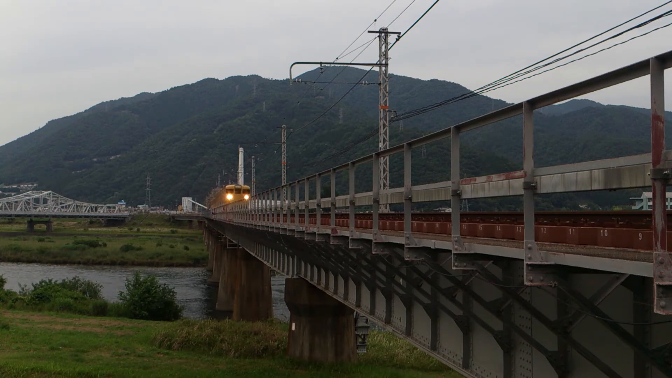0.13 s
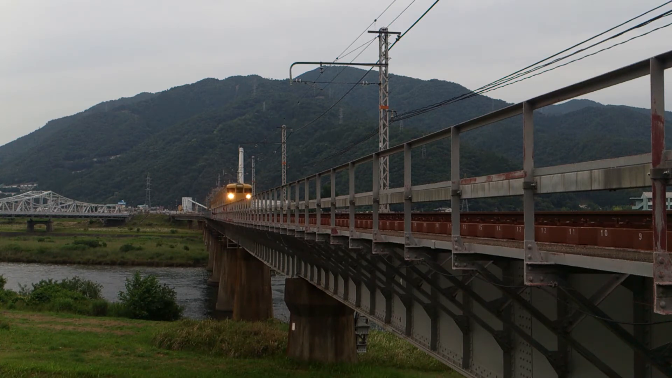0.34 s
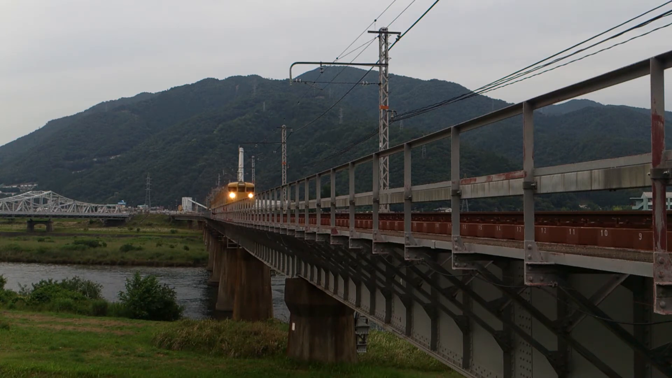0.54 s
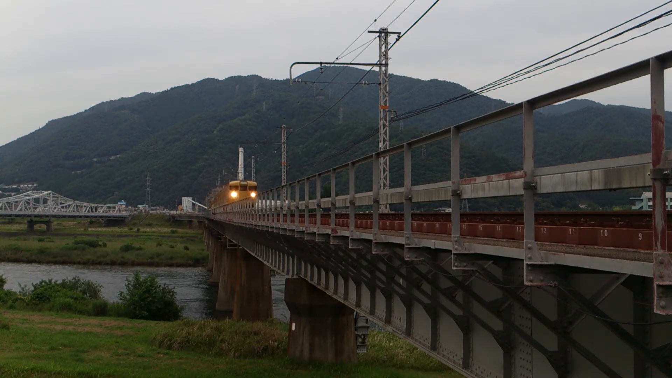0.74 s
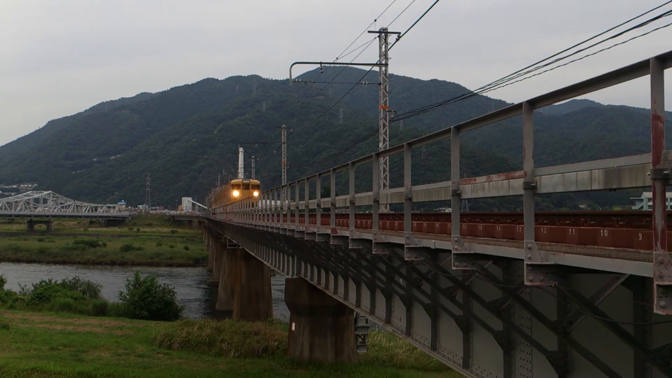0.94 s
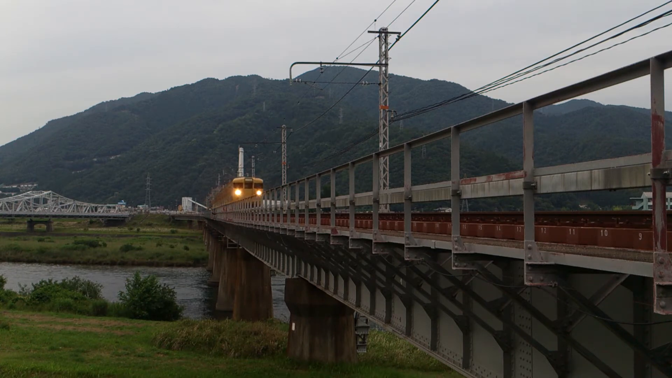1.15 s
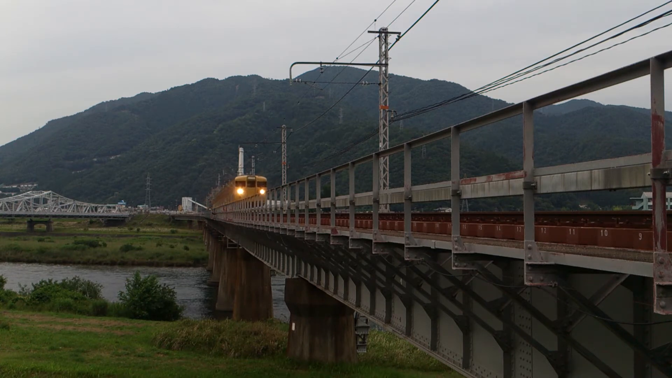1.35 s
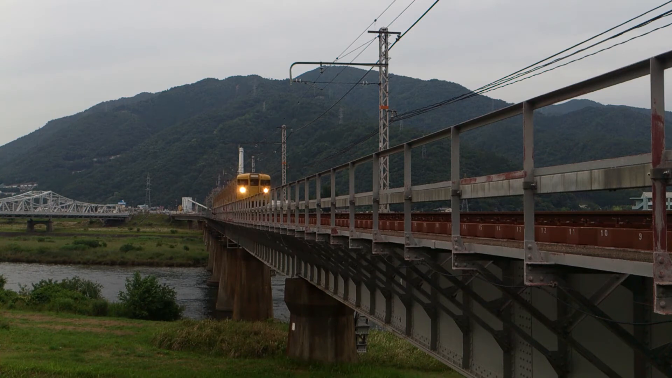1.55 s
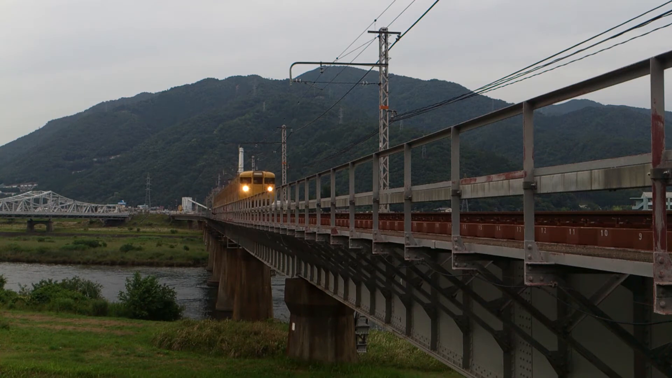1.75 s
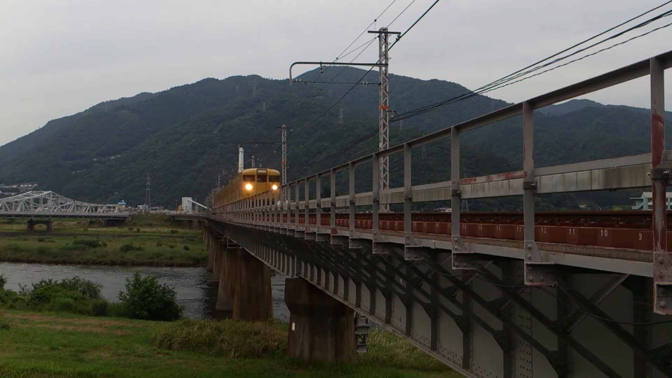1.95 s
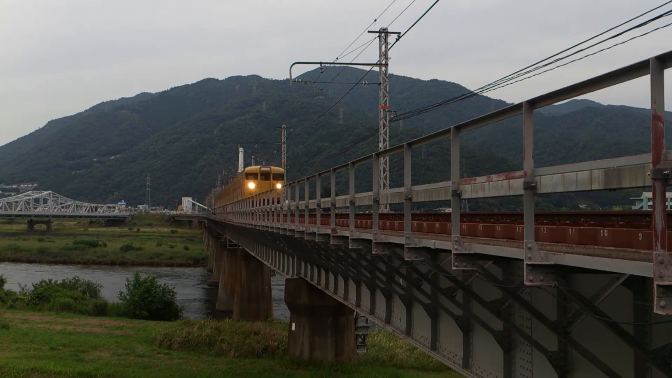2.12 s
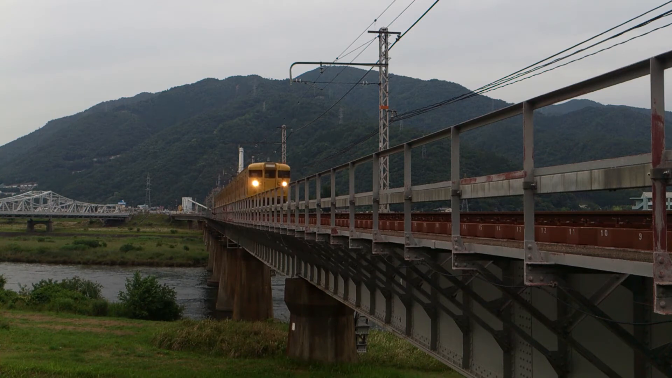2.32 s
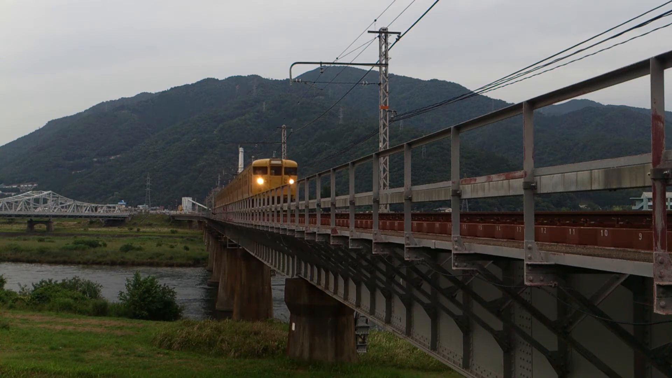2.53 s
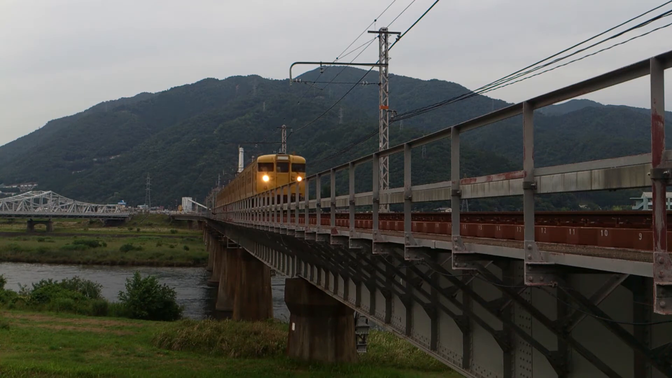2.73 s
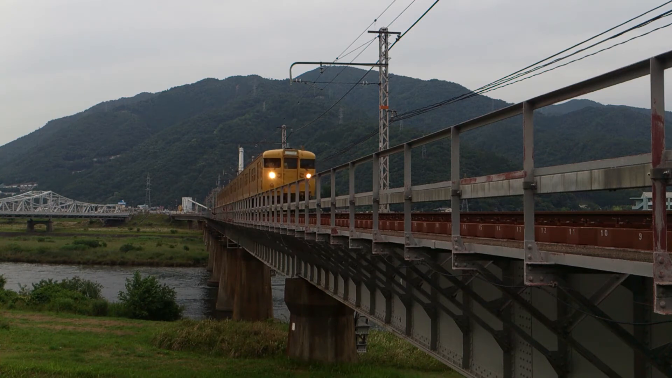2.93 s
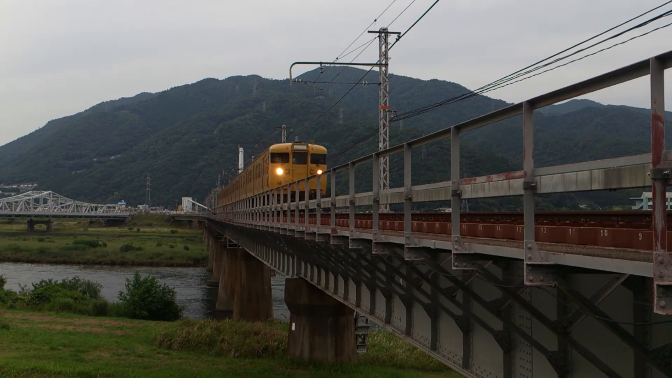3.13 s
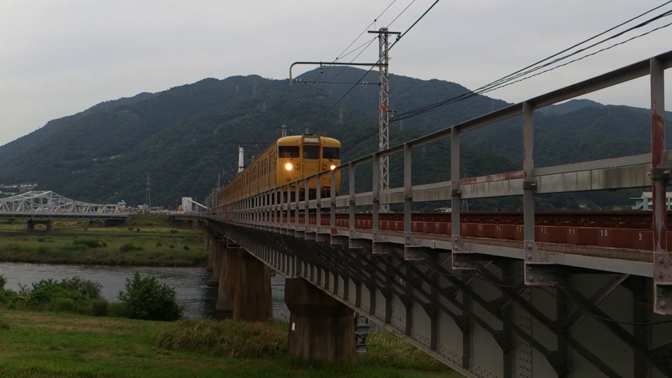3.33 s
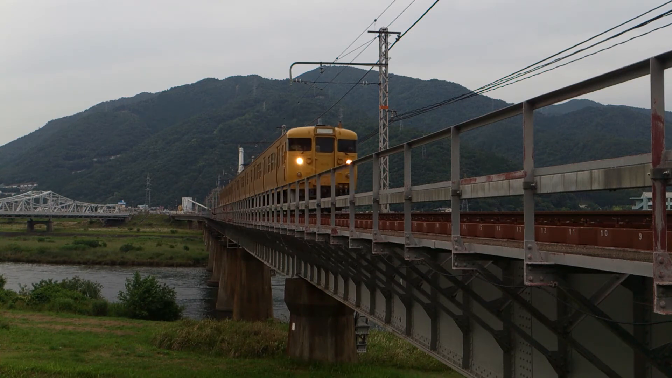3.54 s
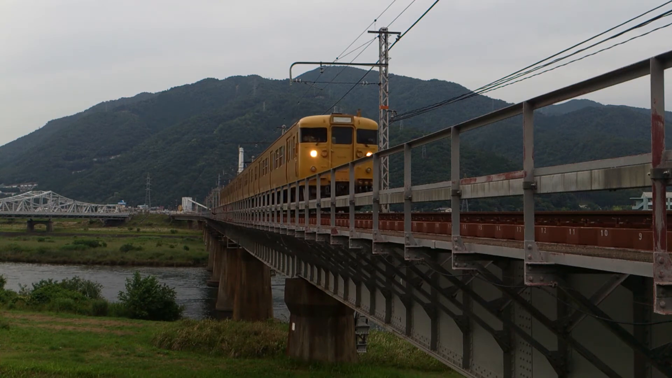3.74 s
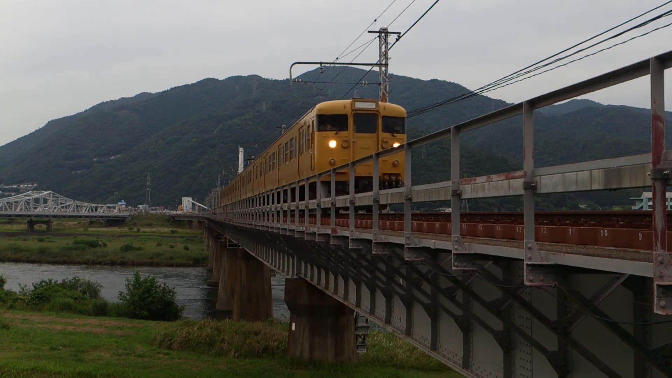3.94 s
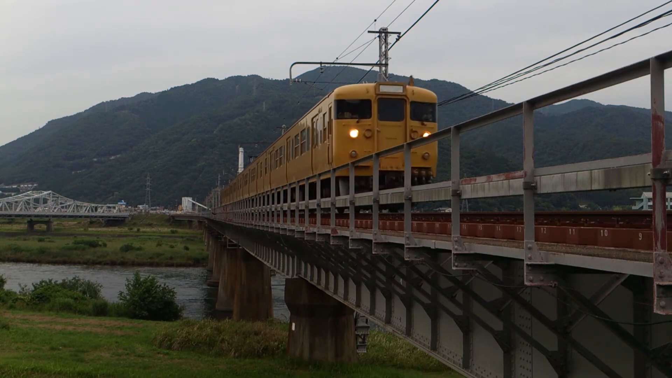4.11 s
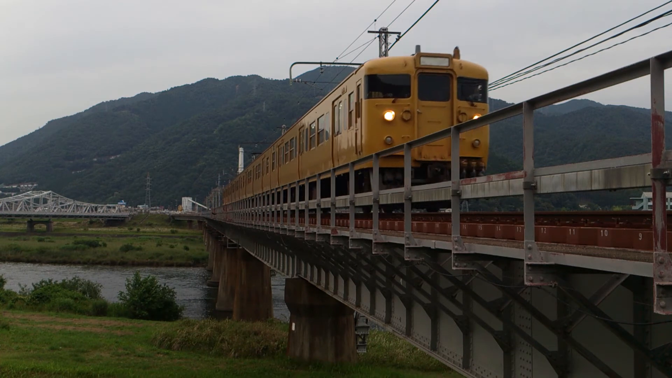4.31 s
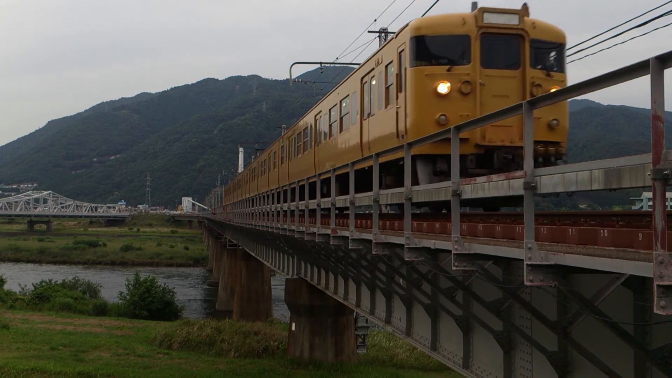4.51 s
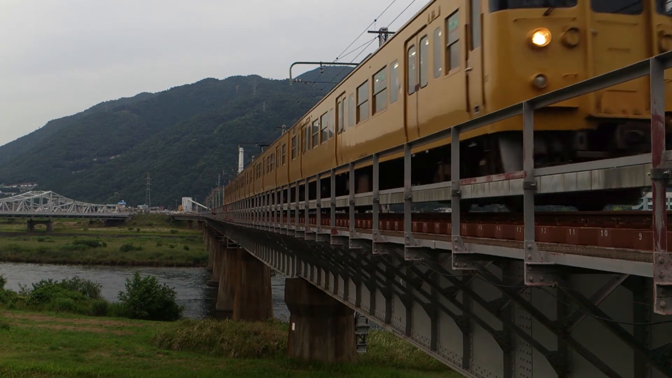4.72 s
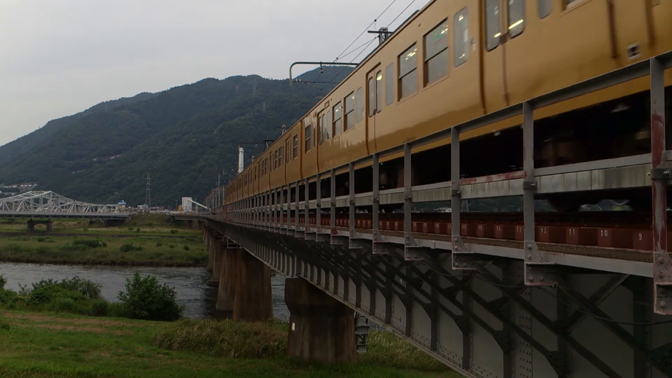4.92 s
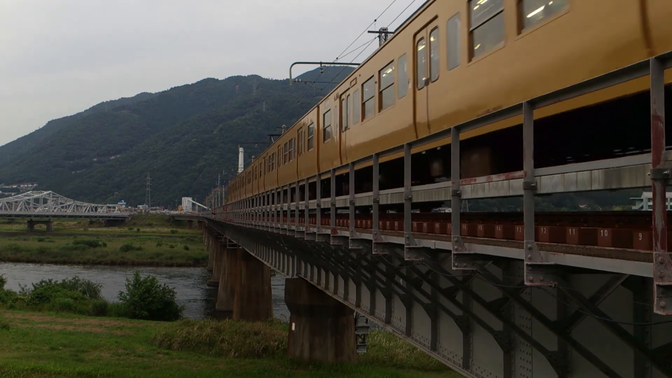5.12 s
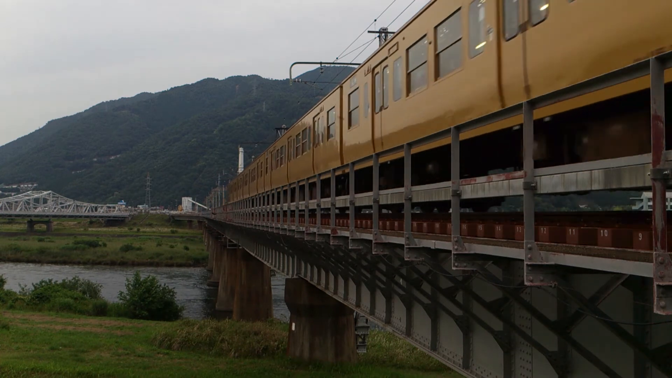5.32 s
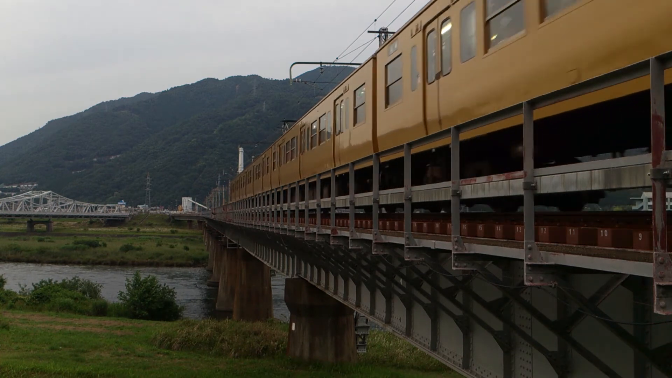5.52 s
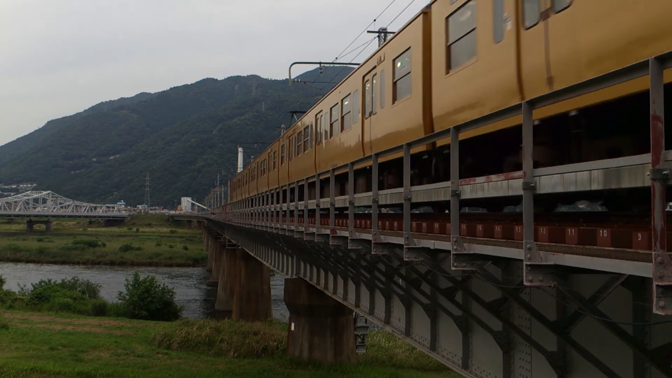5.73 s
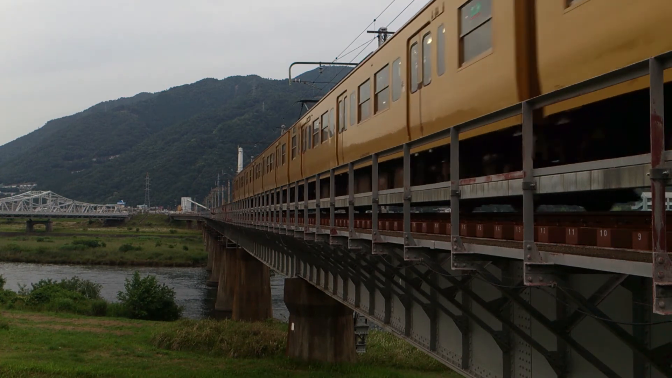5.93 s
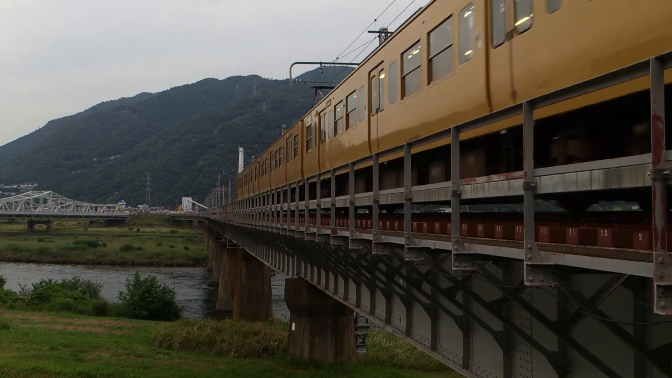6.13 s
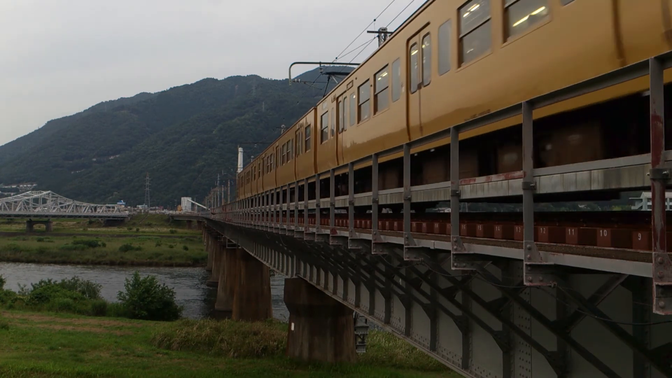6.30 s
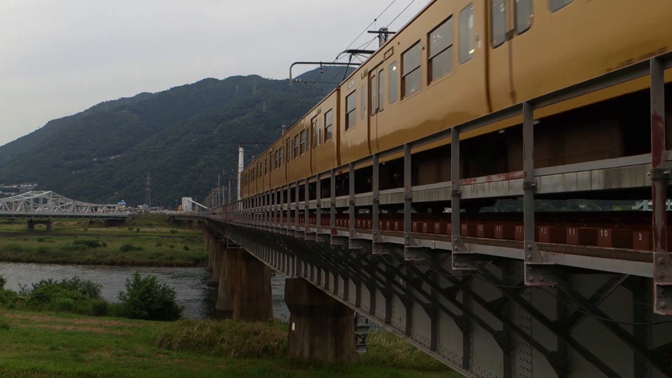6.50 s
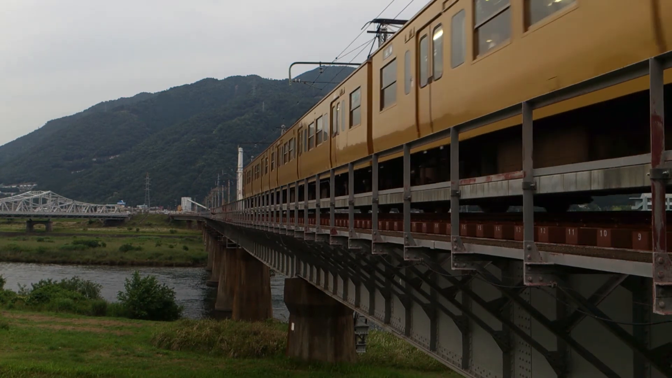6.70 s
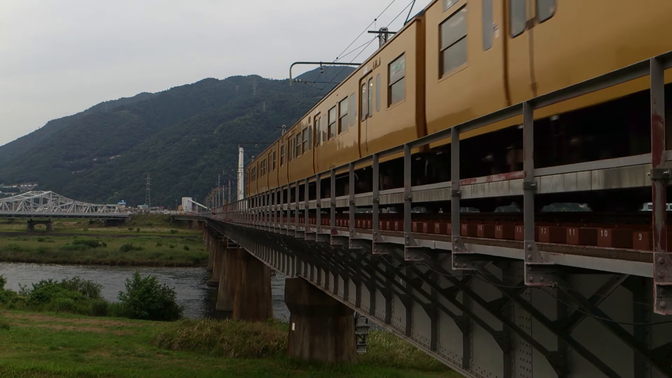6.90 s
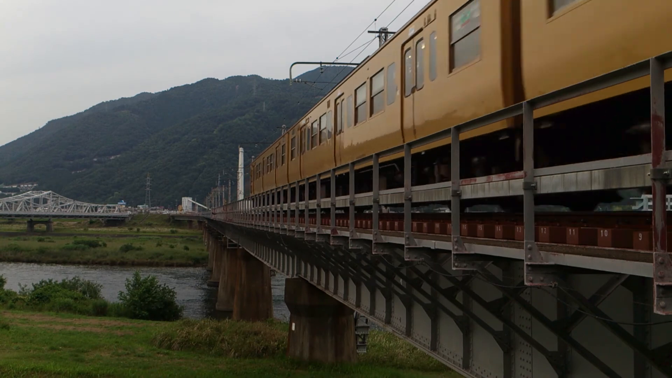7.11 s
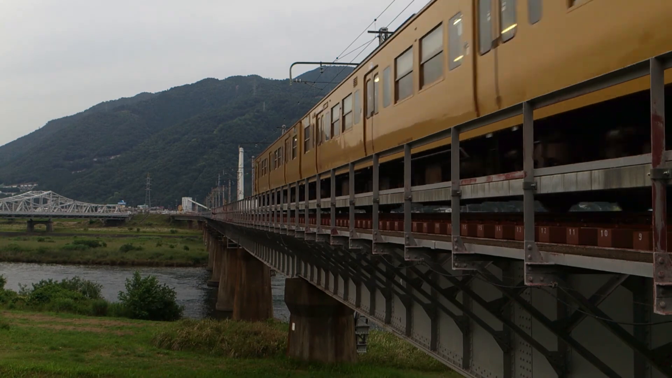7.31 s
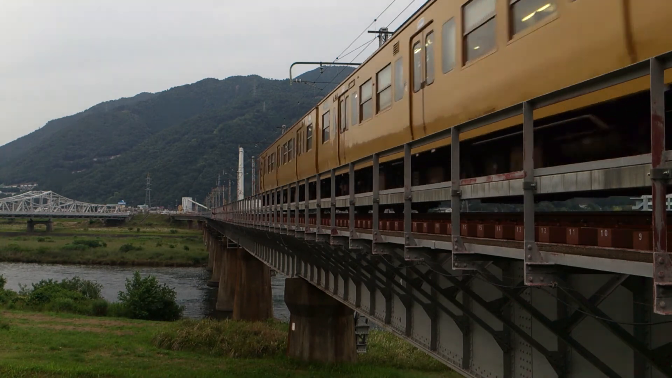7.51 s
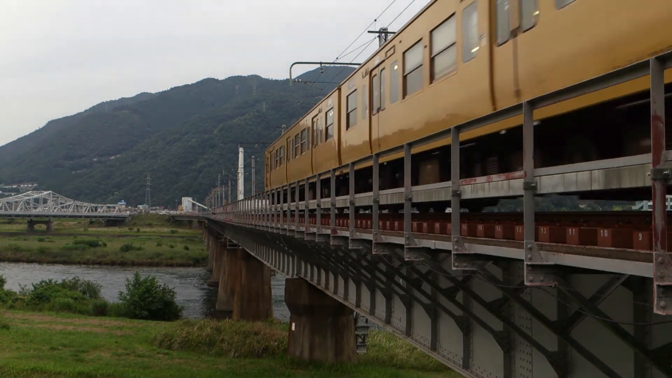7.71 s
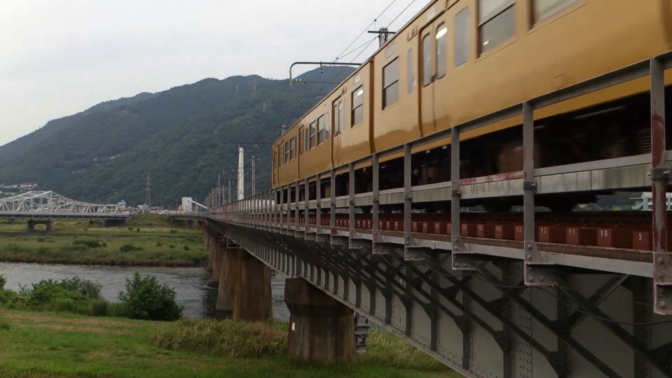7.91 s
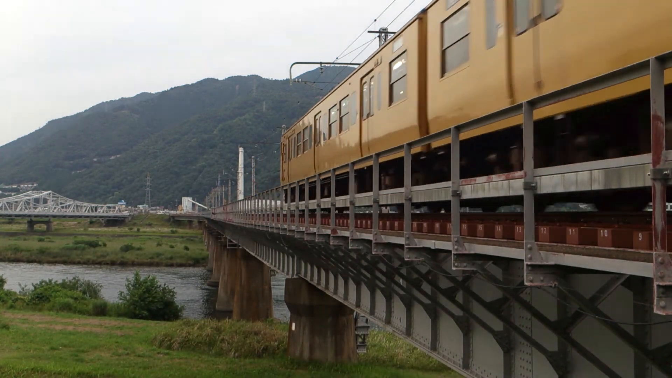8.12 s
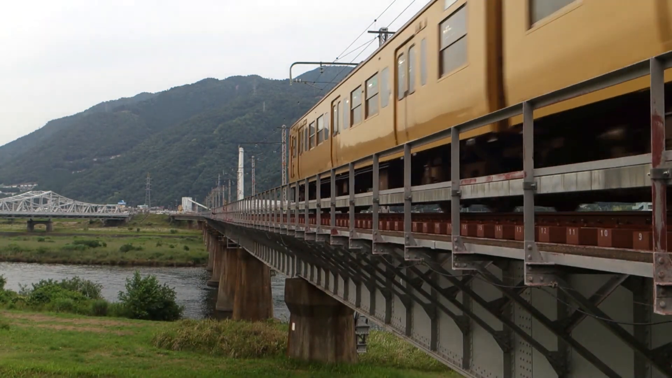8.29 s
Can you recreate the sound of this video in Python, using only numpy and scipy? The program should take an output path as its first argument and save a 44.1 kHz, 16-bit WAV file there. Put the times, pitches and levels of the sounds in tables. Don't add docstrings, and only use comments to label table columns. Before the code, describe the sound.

On an open riverbank beside a steel girder bridge, smooth water hiss lies under a faint, wavering low rumble in the metal. Very close to the microphone, a reflex camera fires at about 0.1, 0.35, 0.6 and 1.0 seconds, each a crisp cluster of mirror and shutter clicks. From 1.8 to 2.7 seconds a small bird gives thin, high ticks. Meanwhile the bridge drone deepens, and from 2.7 seconds faint distant axle knocks come through. A fifth, slightly louder shutter burst lands at 4.0, just as the electric train arrives. From 4.1 the girders boom and hum, with rolling roar and bright steel hiss. Paired clanks and thuds strike the rail joints in recurring groups around 4.2, 5.0-5.7, 6.1-6.9 and 7.3-8.1 seconds, with plates ringing and loose metal tinkling. The strongest bangs come late, and the train is still passing loudly at about 8.3 seconds.

```python
import sys
import numpy as np
from scipy import signal
from scipy.fft import rfft, irfft
from scipy.io import wavfile
from scipy.ndimage import uniform_filter1d

SR = 44100
rng = np.random.default_rng(int(sys.argv[2]) if len(sys.argv) > 2 else 0)


def file_out(sig):
    cols = np.atleast_2d(sig).T
    lim = np.clip(cols, -1, 1)
    pcm = np.round(lim * 32767).astype(np.int16)
    wavfile.write(sys.argv[1], SR, pcm)


def rack_gain(trim_db):
    fader = np.asarray(trim_db, float)
    return 10 ** (fader / 20)


N = 368235

# frequency in Hz, width in Hz, lift in dB.
PLATE_MODES = [(72, 8, 4), (123, 8, 4), (160, 10, 6), (203, 10, 5), (290, 14, 0), (335, 10, 1),
               (368, 10, 4), (435, 12, 2), (560, 12, 2), (635, 10, 3), (665, 14, 5)]
# frequency in Hz, width in Hz, level in dB above the wheel ring.
WHEEL_MODES = [(3500, 490, -10), (4200, 280, -30), (5000, 200, -27), (5960, 270, -14.5), (7170, 200, -19),
               (8050, 120, -13.5)]
# frequency in Hz, density in dB per Hz.
BODY_SPECTRUM = [(12, -53), (20, 9), (87, -1), (211, -4), (240, -5), (273, -3.5), (357, -6), (499, -12),
                 (654, -12.5), (732, -15.5), (900, -16.5), (1170, -54), (1980, -120)]
# frequency in Hz, density in dB per Hz.
CONTACT_SPECTRUM = [(350, -30), (600, -5), (929, -7.5), (1290, -9), (2200, -14.5), (3050, -22.5),
                    (4170, -15), (5190, -21), (5950, -19), (6640, -17), (7610, -9), (9220, -22),
                    (11900, -33), (15100, -34.5), (15700, -40)]
# frequency in Hz, density in dB per Hz.
RIVER_SPECTRUM = [(350, -29), (600, 10), (660, -33), (717, -15), (1310, -15.5), (1790, -18.5),
                  (3650, -25.5), (4360, -25), (5570, -33.5), (7840, -23), (9760, -39), (15800, -44)]
# time in seconds, clank in dB, rail thud in dB, sizzle in dB above clank.
FAR_JOINT = [(2.7094, -35.5, -25.5, -26), (2.8394, -42, -29, -25), (3.5594, -37, -31, -24),
             (3.6894, -37, -27.5, -25), (3.9194, -36, -26.5, -23)]
# time in seconds, clank in dB, rail thud in dB, sizzle in dB above clank.
NEAR_JOINT = [(4.0906, -27.5, -23, -0.5), (4.215, -24, -27, -7), (4.9374, -22, -18.5, -10),
              (5.065, -17, -19, -14), (5.2984, -17.5, -29, -11), (5.4154, -29, -35, 1),
              (6.14, -19, -14, -11), (6.2594, -17.5, -34.5, -10), (6.4994, -18, -26, -11),
              (6.6194, -22, -23, -12), (7.3424, -16.5, -22, -14), (7.4694, -25, -30, -7),
              (7.7094, -11.5, -20, -22), (7.83, -15, -15.5, -22)]
# time in seconds, clank in dB, thud in dB, sizzle in dB above clank.
PAST_JOINT = [(4.1494, -27, -17, -23), (4.2394, -37, -12, -25), (4.3394, -18, -15, -28),
              (5.5194, -19, -36, -20), (5.589, -11.5, -23, -27), (5.712, -10, -19, -23),
              (6.4294, -9, -19, -26), (6.55, -14, -17, -15), (6.7885, -9.5, -17, -23),
              (6.9126, -6, -19, -25), (7.629, -8.5, -14, -21), (7.7544, -12, -17, -29.5),
              (7.988, -5, -13, -20), (8.115, -6.5, -11, -14.5)]
# frequency in Hz, level in dB, T60 in seconds.
FISHPLATE_MODES = [(1750, -15, 0.048), (4540, 4, 0.04), (10100, 7, .012), (10850, 5, .012), (13200, 0, .03),
                   (15300, -6, .03)]
# frequency in Hz, level in dB, T60 in seconds.
RAIL_END_MODES = [(3360, -1, .05), (4200, -5, 0.088), (5000, 10, 0.029), (7400, -37, 0.082)]
# time in seconds, peak in dB, frequency in Hz, T60 in seconds.
PINGS = [(4.088, -23, 1750, 0.23), (4.089, -35, 4600, .12), (4.213, -31, 4660, .12),
         (5.191, -26, 4200, 0.13), (5.425, -24, 3600, 0.083), (5.455, -18, 2230, 0.072),
         (5.59, -28, 4880, .2), (5.69, -27, 4150, 0.14), (5.74, -30, 4930, .15), (6.57, -25, 4050, .15),
         (5.712, -29, 3150, 0.14), (6.789, -10.5, 5040, 0.059), (7.632, -20, 5000, 0.089),
         (8.03, -19.5, 7400, 0.36), (8.118, -18.5, 3550, 0.09)]
# mirror up, curtain and mirror down, all in seconds, level in dB.
SHOTS = [(.1013, .1659, .2065, 0), (.3481, .4153, .4557, -1), (.5974, .6644, .7052, 0),
         (.9956, 1.0568, 1.0978, -1), (3.9991, 4.061, 4.102, 3)]
# delay in ms, peak in dB, ring in Hz, edge in dB above ring, knock in dB above ring.
MIRROR_UP = [
    (0, -28, 7200, -12, -16),
    (3.5, -39, 7600, -15, -10),
    (11.9, -24, 7780, -14, -6),
    (14.6, -17, 8080, -26, -24),
    (18.5, -38, 7800, -16, -12),
    (24.7, -28, 7780, -19, -12),
    (26.5, -36, 7900, -15, -10),
]
# delay in ms, peak in dB, ring in Hz, edge in dB above ring, knock in dB above ring.
CURTAIN = [
    (0, -20, 8060, -15, -13),
    (1.8, -26, 7980, -14, -15),
    (6, -37, 7600, -14, -12),
]
# delay in ms, peak in dB, ring in Hz, edge in dB above ring, knock in dB above ring.
MIRROR_DOWN = [
    (0, -21, 8260, -19, -20),
    (3, -36, 7100, -15, -10),
    (5.9, -25, 8070, -21, -18),
    (9, -30, 8120, -18, -19),
    (12.3, -37, 8200, -17, -12),
    (21, -35, 7500, -15, -12),
    (39, -39, 7500, -12, -10),
]
# time in seconds, peak in dB, pitch in Hz.
TICKS = [(1.81, -44, 4700), (1.94, -51, 4400), (2.181, -42, 5800), (2.1789, -38, 8190), (2.4683, -38, 8930),
         (2.5581, -34, 8290), (2.6589, -34, 8100)]
# time in seconds, level in dB.
LOAD = [(0.0, -27), (0.32, -30), (1.23, -24.5), (1.56, -27.5), (2.04, -25.5), (2.37, -22.5), (2.46, -25.5),
        (2.77, -20), (3.16, -22), (3.53, -19), (3.97, -18.5), (4.11, -12), (4.16, -14.5), (4.81, -13.5),
        (5.42, -14), (5.74, -13.5), (8.35, -14)]
# time in seconds, level in dB.
WHEELS = [(0, -58.5), (2, -60), (2.65, -57), (2.75, -50), (2.9, -47), (3.15, -55), (3.8, -47), (4.05, -43),
          (4.12, -31.5), (4.3, -30.5), (4.5, -37), (4.9, -31.5), (5.3, -29), (6, -28.5), (6.65, -28),
          (7.2, -27.5), (7.7, -29), (8.35, -26)]
# time in seconds, bending hum in dB, heave in dB, deck in dB.
BOGIES = [(4.11, -14.5, -20, -20), (4.95, -16, -20.5, -22), (5.31, -17, -20, -17.5),
          (6.15, -15.5, -21, -31), (6.51, -17.5, -20, -18.5), (7.35, -16, -25, -27),
          (7.72, -18.5, -19.5, -22)]
# level at full load in dB, dB per dB of load, wander in dB, lead through the steel in seconds.
PARTS = [
    (-27.5, 1.05, 3, -0.015),
    (-29.5, 0.85, 1.5, 0.069),
    (-34, 1, 3.5, -0.03),
    (-36.5, 1.1, 2, -0.0072),
    (-26.5, .5, 3.5, 0.074),
    (-20, 1.5, 1.5, -0.083),
    (-22, 0.93, 2, 0.26),
    (-19, 1.33, 1.5, .01),
    (-22.5, 1.7, 2, -0.029),
    (-28, 1.43, 1.5, -0.023),
]
# level when close in dB, dB per dB of wheels, dB per dB of load, river in dB, joint jolt in dB.
ROLLING = [
    (-23, 0.414, 0.93, -46.5, -16.5),
    (-30, 0.97, 0.27, -57, -19.5),
    (-29, 1.85, -2.2, -57, -21),
    (-36.5, 1.5, .05, -61.5, -25.5),
]
# time in seconds, level in dB.
DRONES = [(4.6, -22.5), (5.6, -29), (6.27, -27), (6.55, -16.5), (7.12, -22.5), (7.45, -18), (7.72, -19.5),
          (8.07, -21.5)]
# time in seconds, level in dB.
BOOMS = [(.6, -36), (1.3, -31.5), (2.25, -27), (2.8, -23.5), (3.6, -20.5), (3.85, -22.5), (4.8, -17),
         (5.85, -20), (6.12, -25.5), (7.32, -20.5)]

FULL_LOAD_DB, CLOSE_DB = -14, -28
SPAN_HZ, WEB_HZ = 91.9, 245.5
HUM_RISE_S, HUM_HOLD_S, HUM_T60_S = .028, .22, .35
NEXT_PANEL_S, NEXT_PANEL_DB = 0.334, -11
HEAVE_LAG_S, HEAVE_SPREAD_S = 0.32, 0.11
DECK_LAG_S, DECK_SPREAD_S = 0.64, .14
DRONE_SPREAD_S, BOOM_SPREAD_S = 0.078, .12
ROLLING_EDGES_HZ = [750, 2900, 6200, 9500, 16500]


def unit(x):
    return x / np.sqrt(np.mean(x ** 2))


def curves(table):
    s, *columns = np.transpose(table)
    return [np.interp(np.arange(N) / SR, s, c) for c in columns]


def band(x, lo_hz, hi_hz, order=3):
    return signal.sosfilt(signal.butter(order, [lo_hz, hi_hz], "band", fs=SR, output="sos"), x)


def coloured(spectrum, lo_hz, hi_hz, modes=(), skirt=0.07):
    f = np.fft.rfftfreq(N, 1 / SR) + 1
    hz, db = np.transpose(spectrum)
    gain = rack_gain(np.interp(np.log(f), np.log(hz), db))
    gain = gain / (1 + (lo_hz / f) ** (1 / skirt)) ** .5
    gain = gain / (1 + (f / hi_hz) ** (1 / skirt)) ** .5
    lift = sum(rack_gain(2 * d) / (1 + (2 * (f - m) / w) ** 2) for m, w, d in modes)
    return unit(irfft(rfft(rng.standard_normal(N)) * gain * (1 + lift) ** .5, N))


def walk(rate_hz):
    k = int(SR / rate_hz)
    held = np.repeat(rng.standard_normal(N // k + 1), k)
    return uniform_filter1d(uniform_filter1d(held, k), k)[:N]


def steady(x, seconds):
    k = int(seconds * SR)
    return x / np.sqrt(uniform_filter1d(uniform_filter1d(x ** 2, k), k))


def swell(rows, column, lag_s, spread_s):
    rows, t = np.array(rows), np.arange(0, N, 64) / SR
    bells = rack_gain(rows[:, column, None]) * np.exp(-.5 * ((t - rows[:, :1] - lag_s) / spread_s) ** 2)
    return np.interp(np.arange(N) / SR, t, np.sqrt(np.sum(bells ** 2, axis=0)))


def ring(hz, t60_s, length_s=.4):
    t = np.arange(int(length_s * SR)) / SR
    return np.sin(2 * np.pi * hz * t) * 1000. ** (-t / t60_s)


def build_up(count, rise_s):
    return 1 - np.exp(-np.arange(count) / SR / rise_s)


def strikes(times_s, levels_db):
    x = np.zeros(N)
    np.add.at(x, (np.asarray(times_s) * SR).astype(int), rack_gain(np.asarray(levels_db)))
    return x


def burst(hits, rise_s, hold_s, t60_s):
    t = np.arange(SR) / SR
    shape = build_up(SR, rise_s) * 1000. ** (-np.maximum(t - hold_s, 0) / t60_s)
    return signal.fftconvolve(hits, shape)[:N]


def river():
    out = 0
    for row, lo_hz, hi_hz in zip(ROLLING, ROLLING_EDGES_HZ, ROLLING_EDGES_HZ[1:]):
        out = out + rack_gain(row[3] + 0.46 * walk(3.1)) * coloured(RIVER_SPECTRUM, lo_hz, hi_hz)
    return out


def bird():
    out, t = np.zeros(N), np.arange(int(.014 * SR)) / SR
    waver = 1 + .03 * np.cos(2 * np.pi * 90 * t)
    for s, db, hz in TICKS:
        phase = 2 * np.pi * np.cumsum(hz * waver) / SR
        start = int((s - .003) * SR)
        out[start:start + len(t)] += rack_gain(db - 9.0) * np.hanning(len(t)) * np.sin(phase)
    return out


def camera():
    rows = []
    for *starts_s, shot_db in SHOTS:
        for start_s, clicks in zip(starts_s, (MIRROR_UP, CURTAIN, MIRROR_DOWN)):
            rows += [(start_s + ms / 1000, shot_db + db, *rest) for ms, db, *rest in clicks]
    rows = np.array(rows)
    out = np.zeros(N + SR)
    for (s, db, hz, *_), spread in zip(rows, rng.standard_normal((len(rows), 2))):
        tone = ring(hz * (1 + 0.0061 * spread[1]), 0.0049, length_s=.03)
        tone = tone + .5 * ring(hz * (1.06 + 0.035 * spread[0]), 0.0084, length_s=.03)
        tone = tone * build_up(len(tone), .0006) ** 2
        start = int(s * SR)
        out[start:start + len(tone)] += rack_gain(db + 10.5 + 0.44 * spread[1]) * tone
    s, db, _, edge_db, knock_db = rows.T
    noise = rng.standard_normal(N)
    edge = burst(strikes(s, db + edge_db - 1.5), .0003, 0.00067, 0.0046) * unit(band(noise, 11500, 14600))
    knock = burst(strikes(s, db + knock_db + 0.5), .0001, 0.0014, 0.0097) * unit(band(noise, 4150, 9200))
    buzz = burst(strikes(s, db - 32.5), 0.0011, 0.0044, .15) * coloured(CONTACT_SPECTRUM, 3900, 16000)
    slap_hits = strikes(s, 2 * (db + knock_db) + 27.5)
    slap = burst(slap_hits, .0002, .001, .008) * unit(band(noise, 2200, 4600))
    return out[:N] + edge + knock + slap + buzz


def flickers(count=700):
    lo_hz, hi_hz, t60_s, level_db = 1194, 5620, 0.042, -6
    out, wheels_db = np.zeros(N + SR), curves(WHEELS)[0]
    for when, pitch, size in rng.random((count, 3)):
        i = int(when * N)
        tone = ring(lo_hz * (hi_hz / lo_hz) ** pitch, t60_s, length_s=.08)
        tone = tone * build_up(len(tone), .003)
        out[i:i + len(tone)] += rack_gain(wheels_db[i] + level_db + 9.9 * size) * tone
    return out[:N]


def pings():
    out = np.zeros(N + SR)
    for s, db, hz, t60_s in PINGS:
        tone = ring(hz, t60_s) + .6 * ring(1.02 * hz, .7 * t60_s)
        tone = tone + .5 * ring(.95 * hz, .5 * t60_s) + .4 * ring(1.065 * hz, .4 * t60_s)
        start = int(s * SR)
        out[start:start + len(tone)] += rack_gain(db) * tone * build_up(len(tone), 0.0021)
    return out[:N] * rack_gain(5 * walk(120))


def joint(table, modes, hold_s, t60_s, ring_db):
    rise_s = .0006
    s, clank_db, thud_db, sizzle_db = np.transpose(table)
    sizzle_db = clank_db + sizzle_db
    clank = burst(strikes(s, clank_db - 11.5), rise_s, hold_s, t60_s)
    clank = clank * coloured(CONTACT_SPECTRUM, 1970, 11000)
    sizzle = burst(strikes(s, sizzle_db - 10), rise_s, 0.68 * hold_s, .6 * t60_s)
    sizzle = sizzle * coloured(CONTACT_SPECTRUM, 13000, 16500)
    thud = burst(strikes(s, thud_db - 8.5), 0.002, 1.5 * hold_s, 0.72 * t60_s)
    thud = thud * coloured(CONTACT_SPECTRUM, 760, 3300)
    shake = burst(strikes(s, sizzle_db + ring_db), 0.00092, 0.42 * hold_s, .03) * rng.standard_normal(N)
    steel = sum(rack_gain(db) * ring(hz, mode_t60_s) for hz, db, mode_t60_s in modes)
    return clank + sizzle + thud + signal.fftconvolve(shake, steel)[:N]


def rolling():
    wheels_db = curves(WHEELS)[0] - CLOSE_DB
    load_db = curves(LOAD)[0] - FULL_LOAD_DB
    s, clank_db = np.transpose(NEAR_JOINT + PAST_JOINT)[:2]
    jolts = burst(strikes(s, clank_db), .004, .03, .25)
    rattle = walk(24) + .8 * walk(70)
    shared_db, own_db = [0.32, 1.3, 0.97, 0.98], [0.99, 0.25, 0.35, 0.99]
    out = 0
    for row, lo_hz, hi_hz, shared, own in zip(ROLLING, ROLLING_EDGES_HZ, ROLLING_EDGES_HZ[1:], shared_db, own_db):
        db, per_wheels, per_load, _, jolt_db = row
        size = np.hypot(rack_gain(db + per_wheels * wheels_db + per_load * load_db), rack_gain(jolt_db) * jolts)
        flutter = rack_gain(shared * rattle + own * walk(30) - 1.25)
        out = out + size * flutter * coloured(CONTACT_SPECTRUM, lo_hz, hi_hz)
    for hz, width_hz, db in WHEEL_MODES:
        tone = unit(band(rng.standard_normal(N), hz - width_hz / 2, hz + width_hz / 2, order=1))
        out = out + rack_gain(ROLLING[1][0] + wheels_db + db + 5 * walk(14)) * tone
    return out


def girders():
    load_s, load_db = np.transpose(LOAD)
    sizes = []
    for db, per_load, wander_db, lead_s in PARTS:
        load = np.interp(np.arange(N) / SR + lead_s, load_s, load_db) - FULL_LOAD_DB
        sizes.append(rack_gain(db + per_load * load + wander_db * walk(7)))
    heave, span, web, piers, far, *beams = sizes
    heave = np.hypot(heave, swell(BOGIES, 2, HEAVE_LAG_S, HEAVE_SPREAD_S))
    beams[1] = np.hypot(beams[1], swell(BOOMS, 1, 0, BOOM_SPREAD_S))
    drone = swell(DRONES, 1, 0, DRONE_SPREAD_S)
    deck = swell(BOGIES, 3, DECK_LAG_S, DECK_SPREAD_S)
    s, hum_db = np.transpose(BOGIES)[:2]
    blows = strikes(s, hum_db) + strikes(s + NEXT_PANEL_S, hum_db + NEXT_PANEL_DB)
    bend = burst(blows, HUM_RISE_S, HUM_HOLD_S, HUM_T60_S)

    out = heave * steady(coloured(BODY_SPECTRUM, 58, 84, PLATE_MODES), .15)
    out = out + piers * coloured(BODY_SPECTRUM, 34, 47)
    out = out + far * steady(coloured(BODY_SPECTRUM, 278, 302), .12)
    for rough, size, hz, lo_hz, hi_hz in ((span, bend, SPAN_HZ, 84, 103), (web, drone, WEB_HZ, 238, 258)):
        hum = np.sqrt(2) * np.sin(2 * np.pi * np.cumsum(hz + 2.51 * walk(8)) / SR)
        out = out + .95 * size * hum
        out = out + np.hypot(rough, .25 * size) * coloured(BODY_SPECTRUM, lo_hz, hi_hz)
    edges_hz = [103, 150, 230, 430, 600, 750]
    for size, lo_hz, hi_hz in zip(beams, edges_hz, edges_hz[1:]):
        out = out + size * steady(coloured(BODY_SPECTRUM, lo_hz, hi_hz, PLATE_MODES[:-2]), .12)
    return out + deck * steady(coloured(BODY_SPECTRUM, 590, 720, PLATE_MODES), .12)


def scene():
    far = joint(FAR_JOINT, RAIL_END_MODES, hold_s=0.021, t60_s=0.31, ring_db=-23)
    near = joint(NEAR_JOINT, FISHPLATE_MODES, hold_s=0.038, t60_s=0.033, ring_db=-30)
    past = joint(PAST_JOINT, RAIL_END_MODES, hold_s=0.0085, t60_s=0.099, ring_db=-21.5)
    bank = river() + bird() + camera()
    train = flickers() + pings() + far + near + past + rolling() + girders()
    return (bank + train)[None]


def roll_off(x):
    return signal.sosfilt(signal.butter(12, 16680, fs=SR, output="sos"), x)


def record(dry):
    x = signal.sosfilt(signal.butter(2, 40, "high", fs=SR, output="sos"), dry)
    x = np.tanh(0.94 * x) / 0.87
    x = signal.sosfilt(signal.ellip(12, .3, 80, 15800, fs=SR, output="sos"), x)
    return roll_off(x)


dry = scene()
out = record(dry)
file_out(out)
```